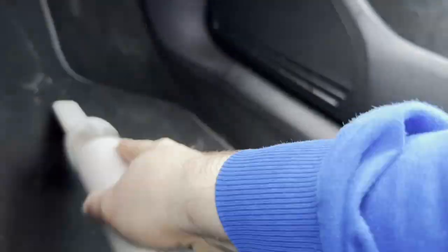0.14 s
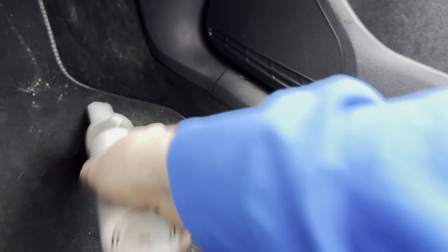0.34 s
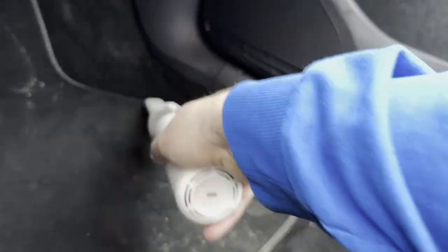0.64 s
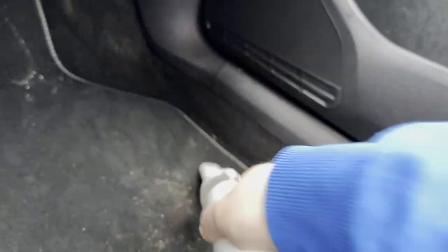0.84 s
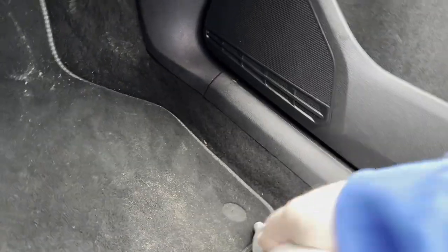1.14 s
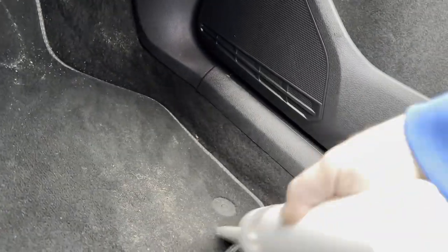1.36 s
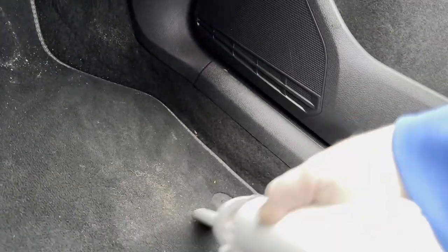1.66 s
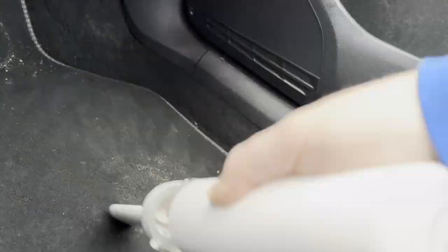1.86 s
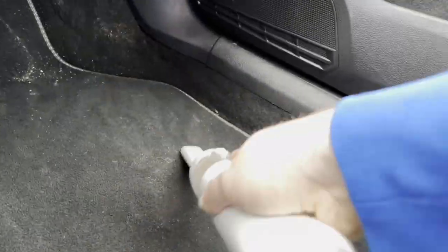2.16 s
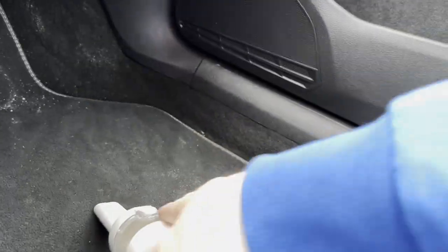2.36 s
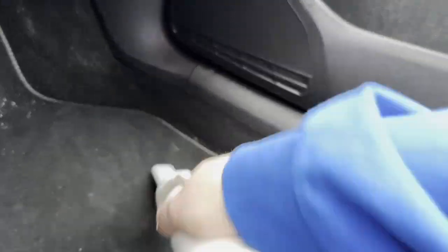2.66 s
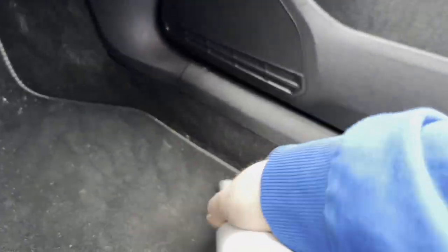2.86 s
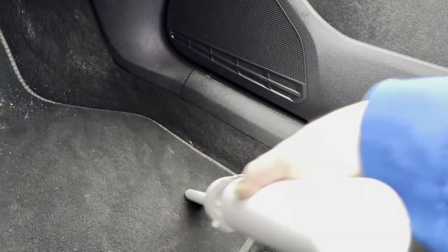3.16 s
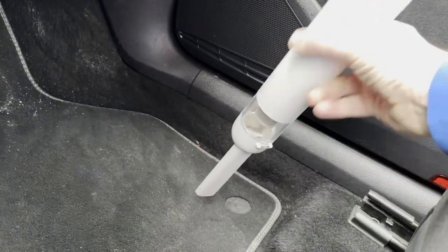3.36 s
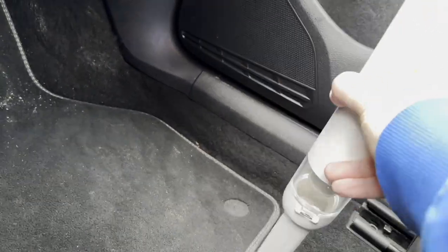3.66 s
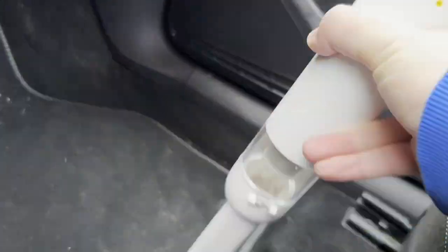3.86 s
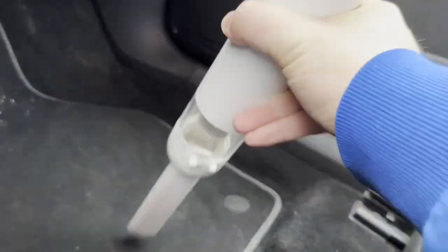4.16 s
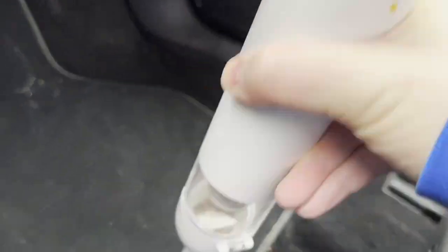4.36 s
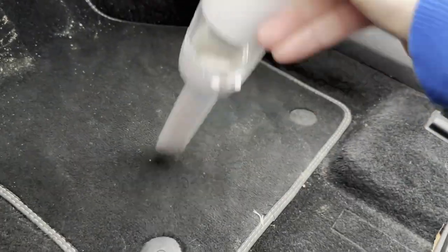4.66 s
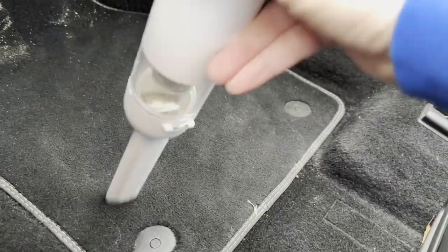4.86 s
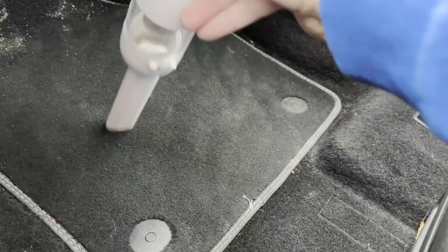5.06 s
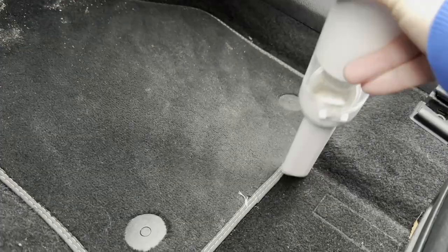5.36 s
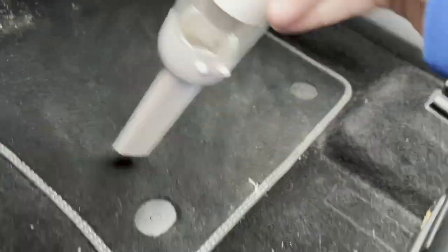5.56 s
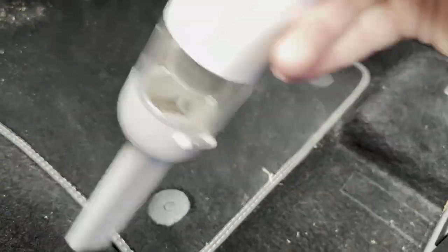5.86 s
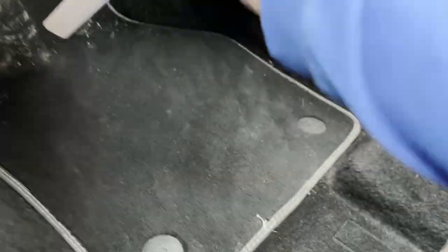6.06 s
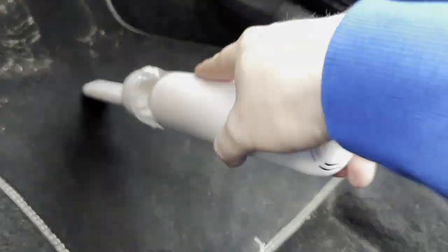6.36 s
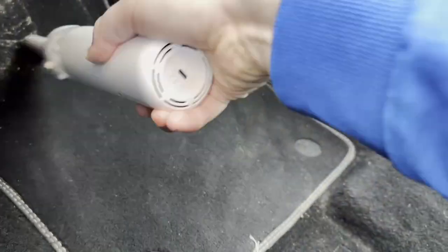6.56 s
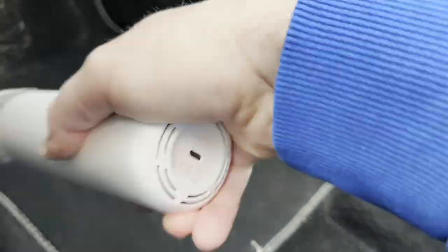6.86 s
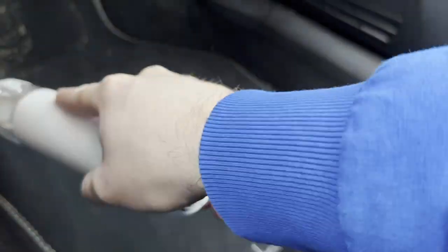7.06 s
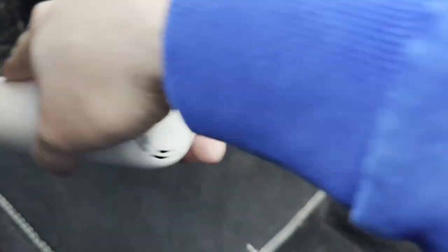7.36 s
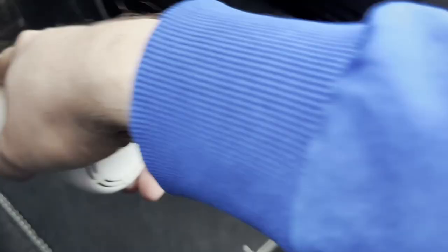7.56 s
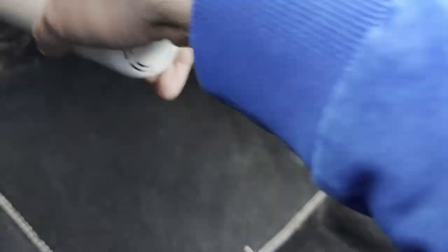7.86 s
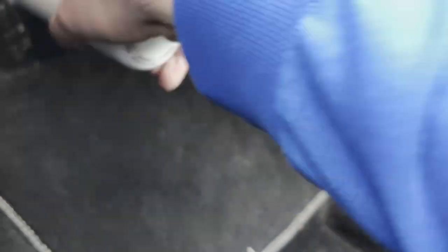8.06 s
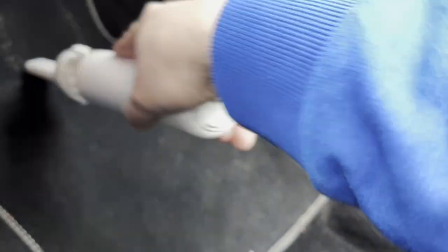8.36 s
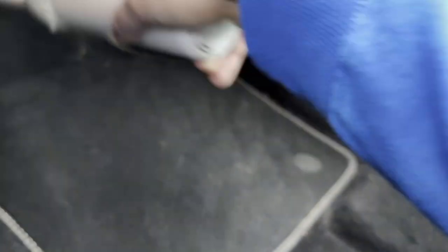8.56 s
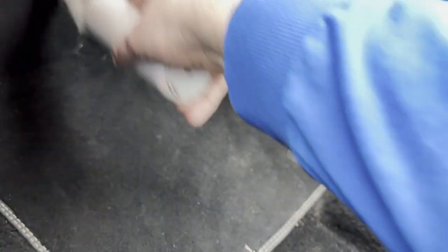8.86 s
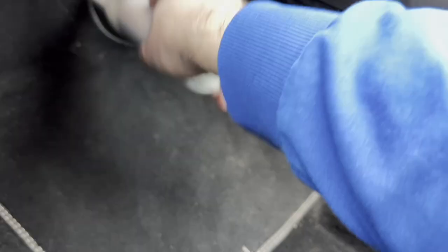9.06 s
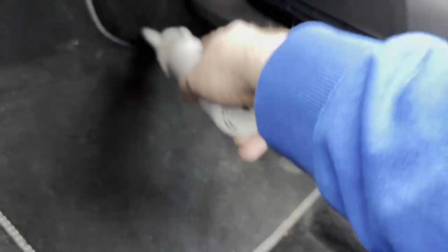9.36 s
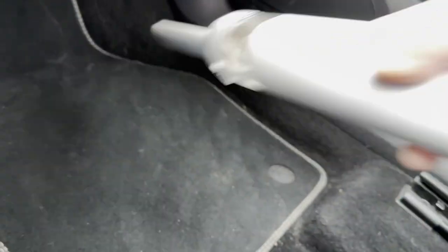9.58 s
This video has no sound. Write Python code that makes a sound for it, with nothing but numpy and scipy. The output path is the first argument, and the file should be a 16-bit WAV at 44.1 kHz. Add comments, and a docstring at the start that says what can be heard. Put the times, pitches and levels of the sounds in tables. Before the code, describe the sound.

Close, thin fan whine and airy hiss from a cordless vacuum, its pitch fluttering with strokes, interrupted by a hard wind burst near three seconds.

```python
"""Cordless vacuum on a car floor mat

Inside a car, a small vacuum scrubs the floor mat an arm's length from a phone with two microphone ports.
Its fast fan whines at one, two and nine times the shaft rate and speeds up whenever the nozzle seals; filtered
noise is the air rushing through nozzle and vents. The exhaust draught buffets the ports with low eddies and
three hard gusts, after which the phone's wind filter and gain control hold the sound down for a while."""
import sys
import numpy as np
from scipy import signal
from scipy.fft import rfft, irfft, next_fast_len
from scipy.io import wavfile
from scipy.ndimage import uniform_filter1d

SR = 44100
rng = np.random.default_rng(int(sys.argv[2]) if len(sys.argv) > 2 else 0)


def voltage_ratio(decibels):
    """Convert decibels (scalar or array-like) to amplitude ratios, 20 dB per decade."""
    exponent = np.asarray(decibels, float) / 20
    return 10 ** exponent


def pcm_store(signal):
    """Save signal as 16-bit PCM."""
    levels = np.round(np.clip(np.atleast_2d(signal), -1, 1) * 32767)
    wavfile.write(sys.argv[1], SR, levels.astype(np.int16).T)


N = 428652
T = np.arange(N) / SR
LEFT_MINUS_RIGHT = np.array([[1], [-1]])


def curves(table):
    """Columns of a table that starts with t/s, one value per sample."""
    s, *columns = np.transpose(table)
    return [np.interp(T, s, c) for c in columns]


def bump(at, length):
    """A smooth rise and fall centred on a moment."""
    return np.cos(np.pi * np.clip((T - at) / length, -.5, .5)) ** 2


def walk(rate):
    """Random levels held 1 / rate s and slewed twice; spread near 1."""
    k = int(SR / rate)
    held = np.repeat(rng.standard_normal(N // k + 1), k)
    return 1.18 * uniform_filter1d(uniform_filter1d(held, k), k)[:N]


# Shaft rate with the nozzle open: [t/s, f/Hz]
SHAFT_RATE = [(0, 1268), (1.2, 1271), (2.35, 1274), (3.25, 1283), (3.7, 1291), (4.3, 1298), (4.95, 1296),
              (5.12, 1306), (5.4, 1289), (5.85, 1296), (6.05, 1287), (7.1, 1297), (7.5, 1304), (7.9, 1312),
              (8.38, 1305), (8.75, 1316), (9.3, 1312), (9.72, 1305)]
# Whine at the ports as the hand turns the case and the cabin favours now one tone, now another, before
# swell and flicker: [t/s, shaft tone level/dB, second tone level/dB, blade tone level/dB]
TONE_LEVELS = [(0, -40, -33, -34), (.12, -37, -30, -33), (.2, -36, -48, -42), (.36, -39.5, -36, -40),
               (.65, -41.5, -33, -37.5), (1.2, -42, -31, -42.5), (1.33, -29, -30, -34.5),
               (1.7, -37, -30, -37.5), (2.1, -32, -29, -35.5), (2.33, -37, -28.5, -35),
               (2.56, -34, -44.5, -38), (2.76, -44, -30, -36.5), (3.12, -37.5, -32.5, -38),
               (3.45, -36.5, -39, -44), (4.1, -35, -37, -44), (5.0, -35, -36, -41.5),
               (5.7, -36.5, -36.5, -48), (5.95, -29.5, -37, -41), (6.2, -37.5, -36, -43.5),
               (7.0, -41, -45, -34.5), (7.6, -40.5, -30, -42), (8.0, -45.5, -43, -44),
               (8.35, -35, -49, -39.5), (8.6, -32, -43, -45), (9.27, -42.5, -40, -46),
               (9.44, -33, -40, -43), (9.72, -29, -45, -39)]
# Bouts of scrubbing; each stroke seals the nozzle and unloads the fan:
# [t/s of the first stroke, strokes, stroke spacing/s, mean speed gain f/Hz]
SCRUB_BOUTS = [(3.45, 1, .25, 105), (3.625, 1, .11, 28), (3.85, 1, .15, 60), (3.995, 4, .091, 30),
               (4.396, 1, .15, 46), (4.563, 5, .114, 28), (5.165, 2, .085, 36), (5.51, 1, .2, 18),
               (5.71, 2, .115, 34), (7.25, 3, .085, 15), (7.535, 6, .087, 28), (8.06, 4, .085, 16),
               (8.41, 3, .086, 24), (8.675, 4, .086, 14), (9.42, 1, .3, 16)]


def shaft_hz():
    """The fan runs faster while a stroke seals the nozzle and unloads it; small random drifts remain."""
    overlap, scatter = 1.15, .3  # stroke length over spacing; uneven gain, share either way
    (hz,) = curves(SHAFT_RATE)
    for first, count, stroke, gain_hz in SCRUB_BOUTS:
        for k in range(count):
            uneven = 1 + scatter * rng.uniform(-1, 1)
            hz = hz + gain_hz * uneven * bump(first + k * stroke, overlap * stroke)
    return hz + 1.44 * walk(25) + 1.674 * walk(60)


def fan():
    """Tones locked to the shaft; hand and cabin echoes make each flicker and shift the low two between ports."""
    lag_spread_deg, lag_per_s = 14, 1.437
    swell_db, swell_per_s = 3, 18  # the low tones swell and sink at random, several times a second
    rough_per_s = 300  # turbulence over the blades smears the tones into a band
    turns = 2 * np.pi * np.cumsum(shaft_hz()) / SR
    shaft_db, second_db, blade_db = curves(TONE_LEVELS)
    # how far the left port lags the right
    shaft_lag, second_lag = (deg + lag_spread_deg * walk(lag_per_s) for deg in (93.6, 90.5))
    # (multiple of the shaft rate, level dB, lag deg, flicker depth, share of noise)
    tones = ((1, shaft_db, shaft_lag, .42, .35),
             (2, second_db, second_lag, .42, .175),
             (9, blade_db, 0.5, .7, .175))
    out = 0
    for order, db, lag_deg, depth, rough in tones:
        phase = order * turns - np.radians(lag_deg) / 2 * LEFT_MINUS_RIGHT
        tone = np.sin(phase) * (1 + rough * walk(rough_per_s))
        swell = (order < 9) * swell_db * walk(swell_per_s)
        flicker = depth * (2.3 * walk(25) + 5.6 * walk(60))
        out = out + np.sqrt(2) * voltage_ratio(db + swell + flicker) * tone
    return out


# Air rush at the ports, before flutter:
# [t/s, rush level/dB, under 900 Hz level/dB over rush, round 3.4 kHz level/dB over rush, treble level/dB over rush]
RUSH_LEVELS = [(0, -31, -2.5, -1.5, -3), (.35, -34.5, -1, 3.5, -1), (1.24, -31.5, 0, -1, -3.5),
               (1.57, -31.5, -1, -4, -1), (3.0, -32, -1.5, -1, -4), (3.6, -34, -2, -1, 0.5),
               (5.1, -32.5, -3, -1.5, 1), (5.5, -34.5, 0.5, 0.5, 0.5), (6.3, -32.5, -2.5, -1.5, -1),
               (7.0, -31, -0.5, 0, 0.5), (7.08, -35, 2, 0.5, 1.5), (7.9, -35, 0, 1, 3),
               (9.3, -34.5, -1, 0, -0.5), (9.72, -31, -4, -4, 1.5)]
# Spectrum of the rush, relative: [f/Hz, level/dB per Hz]
RUSH_COLOUR = [(200, -21.5), (340, -7), (550, -12), (1000, -7.5), (1500, -11), (2500, -9), (4300, -18),
               (5300, -16.5), (6600, -21), (8300, -12), (10300, -16), (11200, -26), (11500, -61)]
# How the two ports hear the air: [f/Hz, likeness -1 to 1, left minus right level/dB, left leads by rad]
PORT_PAIR = [(202, 1, 0.5, -0.5), (572, 0.82, 1.5, 0), (1494, 0.38, 5.5, 3), (1880, 0.23, -3, 6),
             (3440, 0.3, 10.5, 10), (4670, 0.25, 8, 14.5), (8100, 0.23, 7, 12), (9700, 0.94, -3.5, 13.5)]
# Short sucks of air as the nozzle lifts: [t/s, peak level/dB, centre f/Hz, length at half height/s]
NOZZLE_PUFFS = [(1.346, -33.5, 7160, 0.09), (5.09, -32, 3000, 0.035), (5.786, -21.5, 4360, 0.025),
                (9.642, -38, 3600, 0.042)]


def along(octave, table, column):
    """A column of a table that starts with f/Hz, read along log frequency."""
    rows = np.array(table)
    return np.interp(octave, np.log2(rows[:, 0]), rows[:, column])


def port_noise(octave, size):
    """Spectrum of white noise, as alike, balanced and offset in phase as the ports hear it."""
    like, pan_db, lead = (along(octave, PORT_PAIR, k) for k in (1, 2, 3))
    mid, side = rfft(rng.standard_normal((2, size)))
    mid = mid * np.sqrt((1 + like) / 2)
    side = side * np.sqrt((1 - like) / 2)
    white = np.array([mid + side, mid - side]) * voltage_ratio(pan_db / 2 * LEFT_MINUS_RIGHT)
    return white * np.exp(.5j * lead * LEFT_MINUS_RIGHT)


def air():
    """Turbulence in third-octave bands: one random flutter shared by all bands, and a flicker in each band."""
    pipe_hz = 960
    rush_db, lower_db, upper_db, treble_db = curves(RUSH_LEVELS)
    size = next_fast_len(N)
    hz = np.arange(1, size // 2 + 2) * SR / size
    octave = np.log2(hz)
    white = port_noise(octave, size)
    # the nozzle is an open pipe: it favours every multiple of its lowest note, up to where it is too wide
    pipe_db = 1.9 * np.cos(2 * np.pi * hz / pipe_hz) / (1 + (hz / 4800) ** 10)
    colour = white * voltage_ratio(along(octave, RUSH_COLOUR, 1) + pipe_db + 21.5) * (octave > 6)
    flutter, out = 0.51 * walk(22), 0
    for centre in np.arange(7, 14.1, 1 / 3):  # log2 of Hz
        window = np.cos(np.pi * np.clip(1.5 * (octave - centre), -.5, .5)) ** 2
        band = irfft(colour * window, size)[:, :N]
        high = np.clip(centre - 11, 0, 1)
        upper = np.clip(1.5 - 3 * abs(centre - 11.7), 0, 1)
        db = rush_db + (centre < 9.8) * lower_db + upper * upper_db + high * (treble_db + 0.88 * flutter)
        out = out + band * voltage_ratio(db + 0.93 * flutter + 1.95 * walk(14))
    return out + puffs(white, octave, size)


def puffs(white, octave, size):
    """Brief jets of broad-band noise, each centred on its own pitch."""
    out = 0
    for s, peak_db, centre_hz, length in NOZZLE_PUFFS:
        hump = np.exp(-((octave - np.log2(centre_hz)) / 0.89) ** 2) * (octave < 13.4)
        jet = irfft(white * hump, size)[:, :N]
        out = out + voltage_ratio(peak_db) * bump(s, 2 * length) * jet / jet.std()
    return out


def door_echo(rush):
    """The rush again off the door panel, slightly dulled; its delay wanders as the hand moves."""
    echo_db, delay_ms, wander = -10, 1.7, .2  # wander: share of the delay
    lags = [delay_ms / 1000 * (1 + wander * walk(2)) for port in rush]
    door = [np.interp(T - lag, T, port) for lag, port in zip(lags, rush)]
    return voltage_ratio(echo_db) * uniform_filter1d(door, size=3)


# Hard gusts on the ports, before their choppiness: [centre t/s, level/dB, length/s]
HARD_GUSTS = [(1.187, -15, 0.09), (1.774, -17.5, 0.05), (2.978, -23, 0.04), (3.021, -9.5, 0.076),
              (3.061, -14, 0.052), (3.098, -10.5, 0.041), (3.135, -5.5, 0.046), (3.169, -14, 0.037),
              (3.201, -15, 0.029)]
# Spectrum of a gust, relative: [f/Hz, level/dB per Hz]
GUST_SPECTRUM = [(25, 0.5), (80, -3.5), (300, -9.5), (520, -15.5), (800, -26), (2500, -32.5), (5000, -71)]


def gusts():
    """The vent swept right across the ports: dense, choppy buffeting that starts and stops at once."""
    bass_unlike, unlike_hz = 0.18, 1100
    octave = np.log2(np.arange(1, N // 2 + 2) * SR / N)
    colour = voltage_ratio(along(octave, GUST_SPECTRUM, 1))
    mid, side = irfft(rfft(rng.standard_normal((2, N))) * colour, N)
    # the higher the pitch, the less the ports agree
    side = bass_unlike * side + np.gradient(side) * SR / (2 * np.pi * unlike_hz)
    buffet = np.array([mid + side, mid - side]) / mid.std() * voltage_ratio(3.2 * walk(70))
    return buffet * sum(voltage_ratio(db) * np.minimum(2.6 * bump(s, length), 1) for s, db, length in HARD_GUSTS)


def add_eddy(out, at, peak_db, hz, spread):
    """One eddy: a pressure swing of about a cycle and a half, a little unequal at the two ports."""
    half = int(1.5 * SR / hz)
    cycles = np.arange(-half, half) * hz / SR
    swing = voltage_ratio(peak_db) * np.cos(2 * np.pi * cycles) * np.exp(-(cycles / 0.51) ** 2)
    i = np.arange(len(cycles)) + int(at * SR) - half
    keep = (i >= 0) & (i < N)
    out[:, i[keep]] += (1 + spread * LEFT_MINUS_RIGHT) * swing[keep]


# Steady draught on the ports: [t/s, base level/dB of an eddy, how unequally it may strike the two ports]
DRAUGHT_LEVELS = [(0, -36, 0.13), (.2, -28.5, 0), (1.05, -32, 0.45), (1.5, -34.5, 0), (2.2, -34, 0.02),
                  (2.88, -28, 0.08), (3.5, -37, 0.22), (5.9, -36, 0.13), (6.3, -39, 1), (6.8, -34.5, 1.1),
                  (7.6, -34, 0.2), (8.8, -37.5, 0.28), (9.2, -31, 0.4), (9.72, -39.5, 0.7)]
# Single strong eddies: [t/s, peak level/dB, f/Hz]
STRONG_EDDIES = [(1.095, -14.5, 75), (1.172, -11, 89), (1.773, -9, 140), (2.942, -13, 111), (3.012, 1, 256),
                 (4.74, -19.5, 81), (7.926, -18, 76), (9.33, -13.5, 143)]


def draught():
    """A stream of eddies at random moments, of very uneven strength and pitch, and a few strong thumps."""
    out, (db, unlike) = np.zeros((2, N)), curves(DRAUGHT_LEVELS)
    for when, pitch, size, side in rng.random((1200, 4)):
        i = int(when * N)
        hz = 60 * 2 ** (2.2 * pitch ** 1.5)
        peak_db = db[i] + 1.5 - 2.27 * np.log(1.01 - size)  # few are much stronger than the rest
        add_eddy(out, when * N / SR, peak_db, hz, unlike[i] * (2 * side - 1))
    for s, peak_db, hz in STRONG_EDDIES:
        add_eddy(out, s, peak_db, hz, 0.15 * rng.standard_normal())
    return out


def power_db(x, seconds, past=False):
    """Mean power of both ports over a sliding window, centred or wholly in the past."""
    k = int(seconds * SR) // 2
    power = uniform_filter1d(np.mean(x ** 2, axis=0), 2 * k + 1, origin=k * past)
    return 10 * np.log10(np.maximum(power, 1e-12))


def wind_filter(x):
    """Each low band is cut while it is far quieter than the gust just heard in it."""
    memory_s, now_s = 0.34, 0.037
    margin_db, cut_per_db, most_db = 5, 1.27, 23
    out, below = x, 0
    for top_hz in (180, 1150):
        low = signal.sosfiltfilt(signal.butter(2, top_hz, fs=SR, output="sos"), x)
        band, below = low - below, low
        fall_db = power_db(band, memory_s, past=True) - power_db(band, now_s) - margin_db
        cut_db = np.clip(cut_per_db * fall_db, 0, most_db)
        out = out + band * (voltage_ratio(-cut_db) - 1)
    return out


def gain_control(x):
    """Sustained loudness turns the gain down; it creeps back at a steady rate."""
    attack_s, from_db, cut_per_db, release_db_per_s = 0.084, -18.5, 0.62, 3
    cut_db = cut_per_db * np.maximum(power_db(x, attack_s, past=True) - from_db, 0)
    back_db = release_db_per_s * T
    return voltage_ratio(back_db - np.maximum.accumulate(cut_db + back_db))


def scene():
    """Fan, rushing air with its shifting echo off the door, gusts and draught at the two ports."""
    rush = air()
    return fan() + rush + door_echo(rush) + gusts() + draught()


def top_cut(x):
    """Nothing passes above the cut-off."""
    return signal.sosfilt(signal.butter(12, 12380, fs=SR, output="sos"), x)


def record(dry):
    """The deepest bass is trimmed and little is kept above 12 kHz; wind filter, gain control, soft peaks follow."""
    bass_trim = signal.butter(3, 42, "highpass", fs=SR, output="sos")
    top_trim = signal.ellip(8, .2, 40, 12050, fs=SR, output="sos")
    trimmed = signal.sosfilt(top_trim, signal.sosfilt(bass_trim, dry))
    ridden = wind_filter(trimmed) * gain_control(trimmed)
    mix = np.tanh(ridden)  # rounds the hardest gusts
    return top_cut(mix)


dry = scene()
out = record(dry)
pcm_store(out)
```